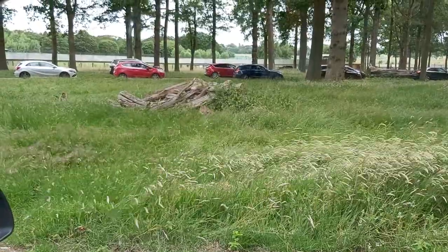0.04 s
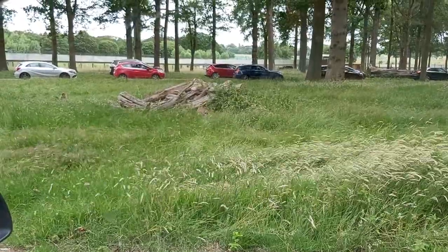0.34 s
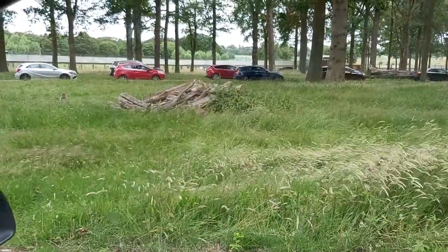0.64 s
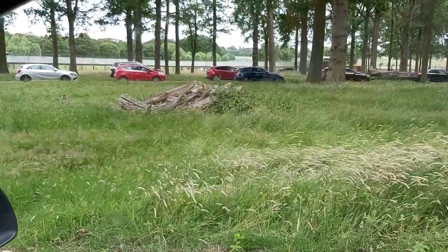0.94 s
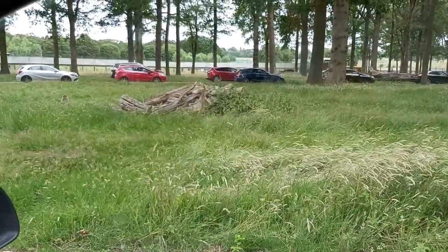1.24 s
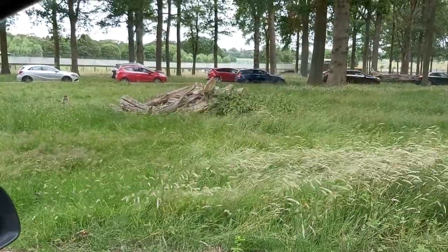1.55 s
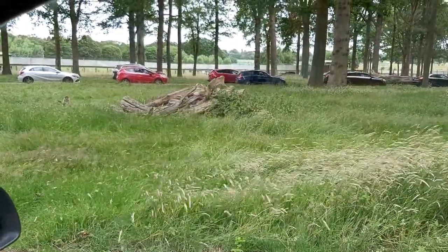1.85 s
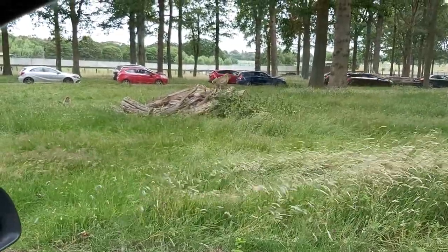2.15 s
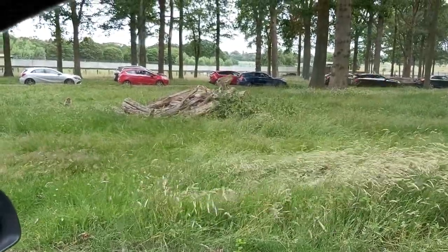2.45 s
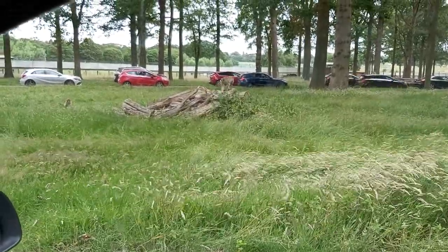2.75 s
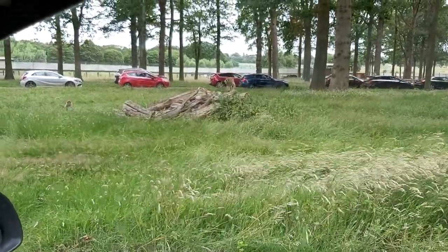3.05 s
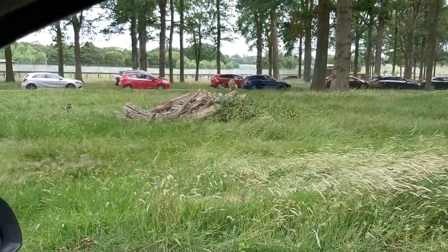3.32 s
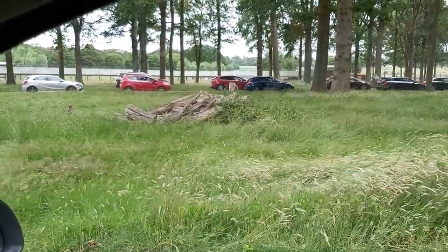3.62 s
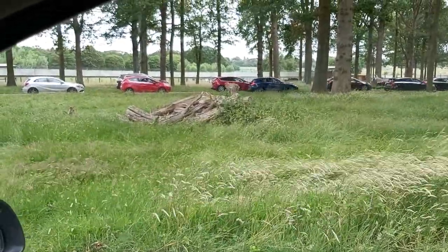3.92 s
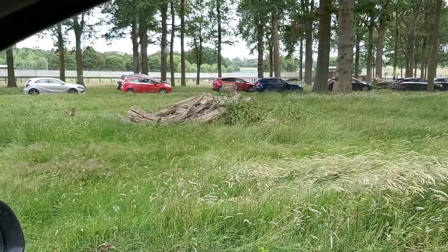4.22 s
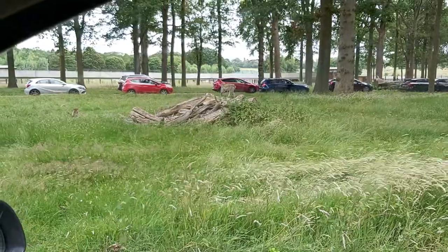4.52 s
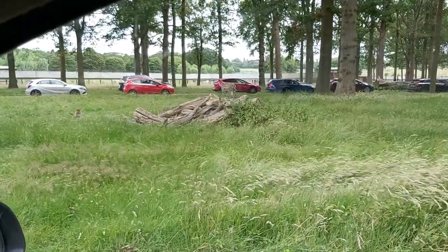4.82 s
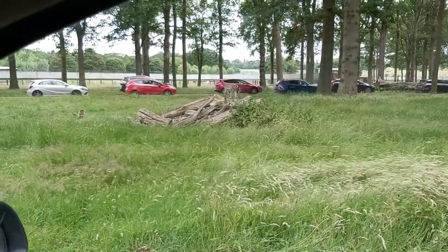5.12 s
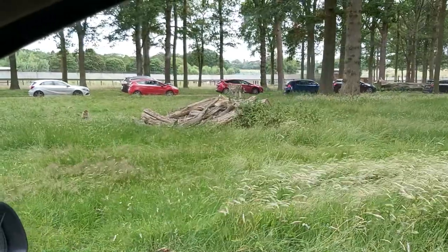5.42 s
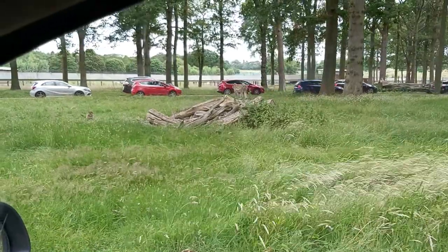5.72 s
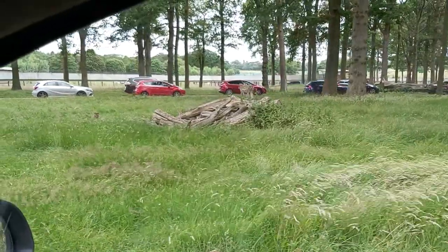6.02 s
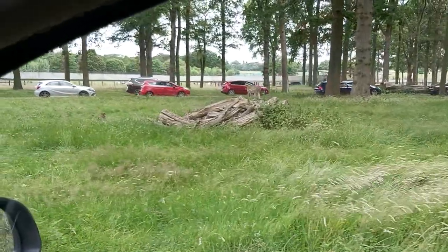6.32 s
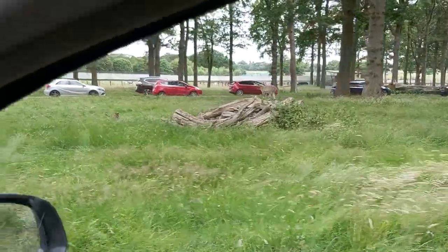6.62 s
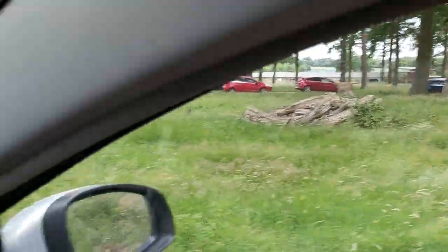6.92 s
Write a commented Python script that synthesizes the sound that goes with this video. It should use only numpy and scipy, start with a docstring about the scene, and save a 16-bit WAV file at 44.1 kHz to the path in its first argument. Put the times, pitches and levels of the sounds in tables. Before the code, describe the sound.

A low engine drone and steady rumble fill the cabin of an idling car, heard on a hand-held microphone. About halfway through the tone shifts as the clutch bites, then the engine strains briefly and the car rolls slowly away. Scattered close knocks and clicks from handling sound over it, with a dull rub at the start and end. A bird outside is only faintly heard.

```python
"""Inside a car that idles, then creeps off along a grass verge, heard on a hand-held camera's microphones.
All around, the four-cylinder engine booms in the cabin air and kicks the body panels, one cylinder harder
than the rest; low rumble, muffled clatter and soft hiss lie under it. Right at the microphones the
camera's case ticks, knocks and rubs in the hand. Farther off, outside, a small bird calls faintly."""
import sys
import numpy as np
from scipy import signal
from scipy.fft import rfft, irfft, next_fast_len
from scipy.io import wavfile
from scipy.ndimage import uniform_filter1d, map_coordinates

SR = 44100
rng = np.random.default_rng(int(sys.argv[2]) if len(sys.argv) > 2 else 0)


def transcribe(signal):
    """Save signal, clipped to [-1, 1], as a 16-bit WAV file at the path in sys.argv[1]."""
    frames = np.atleast_2d(signal).T
    limited = np.clip(frames, -1, 1)
    pcm = np.round(limited * 32767).astype(np.int16)
    wavfile.write(sys.argv[1], SR, pcm)


N = 315756


IDLE_HZ, SAG_HZ, RISE_HZ, SETTLE_HZ_PER_S = 28.318, .108, 2.003, .231  # Hz: firings a second
THROTTLE = (4.654, .823)  # start and length in seconds

def crankshaft(clutch, head_start=2.634):
    """Firings so far: the idle sags on the clutch, climbs with the throttle, then slowly settles."""
    settling_s = np.maximum(np.arange(N) / SR - sum(THROTTLE), 0)
    firing_hz = IDLE_HZ - SAG_HZ * clutch + RISE_HZ * ramp(*THROTTLE) - SETTLE_HZ_PER_S * settling_s
    return head_start + np.cumsum(firing_hz) / SR


# The boom, all around the microphones. Each row: multiple of the firing rate, level in dB when idling,
# on the slipping clutch and rolling, then dB added as the clutch grips and as the engine strains.
BOOM_ORDERS = [(1, -50, -57, -39.5, -2, 1), (2, -30.5, -32, -33.5, -1, 3.5),
               (3, -39.5, -33.5, -38.5, -2.5, -13.5), (4, -36, -45.5, -44, 8, -4),
               (5, -44.5, -49.5, -51, 11, 2)]

def boom(firings, stage, grip, strain, waver_db=.6, smear_rad=.55):
    """The lowest engine orders press on the cabin air as near-pure tones; the body delays them unevenly."""
    out = np.zeros(N)
    for order, *stage_db, grip_db, strain_db in BOOM_ORDERS:
        db = staged(stage_db, stage) + grip_db * grip + strain_db * strain
        phase = 2 * np.pi * order * firings - smear_rad * (order - 2) ** 2
        out += amp(db + waver_db * wobble(8.7)) * np.cos(phase)
    return np.sqrt(2) * out


# The engine's upper tones from inside the car; the odd fractions come from belt-driven parts.
# Each row: multiple of the firing rate, level in dB idling, level in dB pulling.
DRONE_ORDERS = [(6, -56, -48), (6.25, -50, -62), (7, -58, -59), (8.5, -55, -66), (9, -53, -56),
                (9.5, -56, -57), (10, -52, -46), (11, -53, -55), (12, -51.5, -53), (13, -60, -66),
                (14, -60, -57.5), (16, -68, -63), (16.4, -60, -72), (17, -67, -73), (18, -66, -67),
                (19, -65, -72), (20, -61.5, -67), (21, -67, -75)]

def drone(firings, load, waver_db=2.5, drift_rad=.45):
    """Higher orders waver, and change their balance as the engine takes up load."""
    out = np.zeros(N)
    for order, idle_db, pull_db in DRONE_ORDERS:
        phase = 2 * np.pi * (order * firings + rng.random()) + drift_rad * wobble(6)
        db = idle_db + load * (pull_db - idle_db) + waver_db * wobble(4)
        out += amp(db) * np.sin(phase)
    return np.sqrt(2) * out


# The cylinders, in firing order. Each row: relative kick in dB idling, then pulling.
CYLINDER_KICKS = [(0, -8), (-12, -9), (-9, -9), (-12, -12)]
# Body panels around the cabin. Each row: pitch in Hz, width in Hz, gain in dB.
PANEL_MODES = [(115, 45, 0), (185, 55, -3), (285, 75, -2)]

def thumps(firings, load, level_db=-45, scatter_db=.7):
    """Each firing kicks the body panels through the mounts; the uneven cylinders make the idle throb."""
    at = np.flatnonzero(np.diff(np.floor(firings - .1))) + 1  # one sample for each firing
    cylinder = firings[at].astype(int) % len(CYLINDER_KICKS)
    idle_db, pull_db = np.array(CYLINDER_KICKS)[cylinder].T
    kicks = np.zeros(N)
    kicks[at] = amp(idle_db + load[at] * (pull_db - idle_db) + scatter_db * rng.standard_normal(len(at)))
    soft = signal.sosfilt(signal.butter(4, 430, fs=SR, output="sos"), kicks)  # rubber mounts pass no treble
    return -amp(level_db) * unit(ring(soft, PANEL_MODES))


# One shuddering panel of the cabin. Its row: pitch in Hz, width in Hz, gain in dB.
SHUDDER_MODE = [(280, 70, 0)]

def shudder(strain, peak_db=-42):
    """One body panel rumbles in a narrow band while the engine strains."""
    band = ring(ring(rng.standard_normal(N), SHUDDER_MODE), SHUDDER_MODE)
    return amp(peak_db) * strain * unit(band)


# The body's rumble, on all sides. Each row: frequency in Hz, relative density in dB.
RUMBLE_SPECTRUM = [(15, -23.5), (30, -7.5), (50, -6), (85, 2.5), (120, -0.5), (190, -2.5), (230, -6.5),
                   (275, -4), (315, -7.5), (390, -16.5), (470, -12), (590, -17), (700, -27.5),
                   (1200, -66.5)]

def rumble(firings, stage, stage_db=(-37.5, -37, -38.5), throb_db=.7):
    """The car's body rumbles, swelling a little with every firing."""
    db = staged(stage_db, stage) + throb_db * np.sin(2 * np.pi * firings) + 1.2 * wobble(6.2)
    return amp(db) * noise(RUMBLE_SPECTRUM)


# The clatter as it reaches the cabin. Each row: frequency in Hz, relative density in dB.
CLATTER_SPECTRUM = [(300, -18.5), (550, -9.5), (720, 4), (900, -1.5), (1100, -1), (1400, -11), (1700, -9.5),
                    (2000, -21), (2800, -28.5), (3600, -38.5), (7000, -58)]

def clatter(firings, stage, stage_db=(-58.5, -58, -57.5), pulse_db=.5, cycle_db=1.2, cycle_lag=.28):
    """Muffled clatter swells with each firing, and more with each full cycle of the engine."""
    cycle = np.cos(2 * np.pi * (firings / len(CYLINDER_KICKS) - cycle_lag))
    pulse = np.sin(2 * np.pi * firings)
    db = staged(stage_db, stage) + cycle_db * cycle + pulse_db * pulse + 1.2 * wobble(9)
    return amp(db) * noise(CLATTER_SPECTRUM)


# The case slips, right at the microphones. Each row: start in seconds, levels of the knock, the tap
# and the snap in dB, left minus right in dB.
CASE_SLIPS = [(.946, -34, -44, -62, 1), (2.276, -46, -57, -73, 0), (2.630, -40, -43, -64, 1),
              (3.580, -29, -43, -52, 1), (4.010, -28, -47, -61, 0), (4.289, -29, -43, -55, 1),
              (4.540, -38, -46, -56, 2), (4.618, -44, -53, -70, 0), (4.719, -44, -54, -64, 0),
              (4.997, -36, -45, -58, 2), (6.752, -40, -51, -63, 1), (6.953, -29, -43, -64, 3),
              (6.992, -30, -43, -59, 4), (7.094, -28, -45, -62, 2), (7.130, -34, -46, -65, 1)]
# The case's low, middle and high resonances. Each row: pitch in Hz, width in Hz, gain in dB.
KNOCK_MODES = [(270.4, 29, 6.5), (447, 43, -16.5)]
TAP_MODES = [(600, 110, 5), (740, 110, 3), (900, 130, 2), (1060, 120, 3), (1200, 130, 1), (1420, 240, -6.5)]
SNAP_MODES = [(2450, 350, 0), (3080, 260, 6), (4200, 700, -6), (7500, 750, 4)]

def case_ticks():
    """Each slip of the case is a low knock, a hollow tap and a short bright snap that the cabin answers."""
    out, t = np.zeros((2, N + SR)), np.arange(SR // 4) / SR
    peaked = lambda x: x / np.sqrt(uniform_filter1d(x ** 2, size=220).max())  # loudest 5 ms at rms 1
    burst = lambda t60: rng.standard_normal((2, len(t))) * amp(-60 * t / t60) * (1 - np.exp(-t / .001))
    push = t * np.exp(-t / .00054)
    for start_s, knock_db, tap_db, snap_db, pan_db in CASE_SLIPS:
        knock = amp(knock_db) * peaked(ring(push, KNOCK_MODES))
        tap = amp(tap_db) * peaked(echoes(ring(burst(.045), TAP_MODES), t60=.09, wet_db=-3))
        snap = amp(snap_db) * peaked(echoes(ring(burst(.016), SNAP_MODES), t60=.28, wet_db=-4))
        pan = amp([[pan_db / 2], [-pan_db / 2]])
        out[:, round(start_s * SR):][:, :len(t)] += (knock + tap + snap) * pan
    return out[:, :N]


# The hand shifts, close to the microphones. Each row: peak in seconds, width in seconds, level in dB.
HAND_SHIFTS = [(.2, .2, -43), (7.05, .2, -43)]
# Its dull rub. Each row: frequency in Hz, relative density in dB.
RUB_SPECTRUM = [(30, -15), (150, -1.5), (280, 0), (400, -16), (800, -17.5), (1400, -30), (2500, -44),
                (8000, -61)]

def hand_rub():
    """The hand rubs dully on the case whenever the camera is moved."""
    return sum(amp(db) * swell(peak_s, width_s) for peak_s, width_s, db in HAND_SHIFTS) * noise(RUB_SPECTRUM)


# A small bird, some way off outside the car. Each row: start and length in seconds,
# pitch in Hz at the start, middle and end, level in dB.
BIRD_CALLS = [(.286, .009, 5100, 4550, 4200, -56), (.613, .009, 4700, 4300, 4100, -70),
              (5.76, .17, 5350, 6030, 5450, -74)]

def bird():
    """Two sharp chips and a thin, quavering arched whistle, echoing among the trees."""
    out = np.zeros(N)
    for start_s, length_s, start_hz, middle_hz, end_hz, db in BIRD_CALLS:
        progress = np.linspace(0, 1, int(length_s * SR))
        arch = np.polyfit([0, .5, 1], [start_hz, middle_hz, end_hz], 2)
        quaver = 1 + .01 * wobble(90)[:len(progress)]
        hz = quaver * np.polyval(arch, progress)
        envelope = amp(db) * np.sqrt(np.abs(np.sin(np.pi * progress)))
        out[round(start_s * SR):][:len(hz)] += envelope * np.sin(2 * np.pi * np.cumsum(hz) / SR)
    return echoes(out, t60=.3, wet_db=-6)


# A rush in the background. Each row: frequency in Hz, relative density in dB.
SWISH_SPECTRUM = [(500, -33.5), (1050, 2), (1600, -6.5), (2300, -9.5), (3200, -21.5), (8000, -27)]

def swish(peak_s=5.92, width_s=.13, level_db=-66):
    """A faint, soft rush swells once and fades as the car rolls."""
    return amp(level_db) * swell(peak_s, width_s) * noise(SWISH_SPECTRUM)


# The cabin's hiss, far under the engine. Each row: frequency in Hz, relative density in dB.
AIR_SPECTRUM = [(500, -10), (2000, 0), (2800, 2.5), (3500, .5), (4400, 1.5), (5600, -2), (6800, -1.5),
                (7700, -1), (8200, -3), (9500, -5.5), (12000, 0), (15700, -2)]

def cabin_air(level_db=-75):
    """A soft, broad hiss holds steady throughout."""
    return amp(level_db) * noise(AIR_SPECTRUM)


def thin_hiss():
    """A faint band of hiss sits lower in pitch while the car gets under way."""
    def band(hz, width_hz, db):
        white = rng.standard_normal((2, N))
        return amp(db) * unit(filtered(white, lambda f: np.exp(-((f - hz) / width_hz) ** 2)))
    low = ramp(3.0, .45) - ramp(5.38, .15)
    return (1 - low) * band(hz=7520, width_hz=520, db=-85) + low * band(hz=6480, width_hz=400, db=-88)


# The cabin's noise across the two microphones. Each row: frequency in Hz, left-right correlation.
LIKENESS = [(60, .92), (130, 1), (290, 0.99), (640, 0.56), (1300, 0.36), (2500, 0), (15000, 0.12)]

def noise(spectrum):
    """Stereo noise of rms 1, alike on both sides in the bass."""
    def mid_and_side(hz):
        spread = np.arccos(np.clip(along(LIKENESS, hz), -1, 1)) / 2
        return amp(along(spectrum, hz)) * [np.cos(spread), np.sin(spread)]
    mid, side = filtered(rng.standard_normal((2, N)), mid_and_side)
    return unit(np.array([mid + side, mid - side]))


def amp(db):
    """Decibels as amplitude."""
    return 10 ** (np.asarray(db) / 20)


def unit(x):
    """x scaled to rms 1."""
    return x / np.sqrt(np.mean(x ** 2) + 1e-20)


def along(points, hz):
    """A curve through (Hz, value) points on a log axis."""
    point_hz, values = np.transpose(points)
    return np.interp(np.log(hz + 1), np.log(point_hz + 1), values)


def wobble(rate):
    """A smooth random curve, rate knots a second."""
    return map_coordinates(rng.standard_normal(int(N * rate / SR) + 4), [np.arange(N) * rate / SR])


def ramp(start_s, length_s):
    """0 before the start, then a straight rise to 1."""
    return np.clip((np.arange(N) / SR - start_s) / length_s, 0, 1)


def swell(peak_s, width_s):
    """A bell that rises to 1 and fades."""
    return np.exp(-((np.arange(N) / SR - peak_s) / width_s) ** 2)


def staged(levels, stage):
    """Blend three levels as the stage goes from idling (0) over the slipping clutch (1) to rolling (2)."""
    return np.interp(stage, np.arange(len(levels)), levels)


def filtered(x, response):
    """x times a complex response of frequency."""
    size = x.shape[-1]
    padded = next_fast_len(size + SR // 2)
    return irfft(rfft(x, padded) * response(np.fft.rfftfreq(padded, 1 / SR)), padded)[..., :size]


def ring(x, modes):
    """x through a set of resonances of alternating sign."""
    return filtered(x, lambda f: sum((-1) ** k * amp(db) * 1j * f * width / (hz**2 - f**2 + 1j * f * width)
                                     for k, (hz, width, db) in enumerate(modes)))


def echoes(x, t60, wet_db):
    """x plus a dying tail of reflections, different on each side."""
    t = np.arange(SR // 2) / SR
    tail = rng.standard_normal((2, len(t))) * amp(-60 * t / t60)
    wet = signal.fftconvolve(np.atleast_2d(x), tail / np.linalg.norm(tail[0]), axes=1)
    return x + amp(wet_db) * wet[:, :x.shape[-1]]


def scene():
    """The clutch bites, the revs climb, the car rolls; one crankshaft times the engine's sounds."""
    clutch, move_off = ramp(3.0, .15), ramp(4.95, .43)
    grip = swell(4.45, .33)  # the clutch grips fully just before the car moves
    strain = swell(5.2, .33)  # hardest while the revs climb
    stage = clutch + move_off
    load = staged([0, .28, 1], stage)  # share of the full load
    firings = crankshaft(clutch)
    engine = boom(firings, stage, grip, strain) + drone(firings, load)
    body = thumps(firings, load) + shudder(strain) + rumble(firings, stage)
    background = clatter(firings, stage) + cabin_air() + thin_hiss() + swish()
    return engine + body + background + hand_rub() + case_ticks() + bird()


# The camera's microphone pair. Each row: frequency in Hz, left minus right in dB.
MIC_BALANCE = [(30, -5.5), (60, -3.6), (110, -1), (200, -3), (330, -4.5), (700, -2), (1290, -2.5),
               (2380, -1.5), (4400, -1), (8120, -5.5), (15000, -3.3)]
# Phase across the pair. Each row: frequency in Hz, lead of the left side in radians.
MIC_LEAD = [(60, .5), (130, 0.1), (400, 0.87), (600, 0.79), (860, 2.35), (1210, 2.87), (1550, 2.6),
            (4000, 2.16)]

def record(dry, top_hz=15730):
    """The two microphones differ in level and phase; nothing is kept above the band limit."""
    sides = np.array([[.5], [-.5]])
    mics = lambda hz: amp(sides * along(MIC_BALANCE, hz)) * np.exp(1j * sides * along(MIC_LEAD, hz))
    fades = signal.windows.tukey(N, .002)
    return filtered(dry * fades, lambda hz: mics(hz) * (hz < top_hz))


dry = scene()
out = record(dry)
transcribe(out)
```